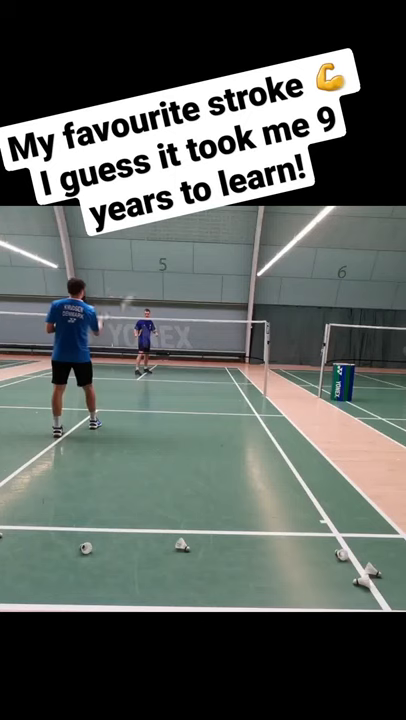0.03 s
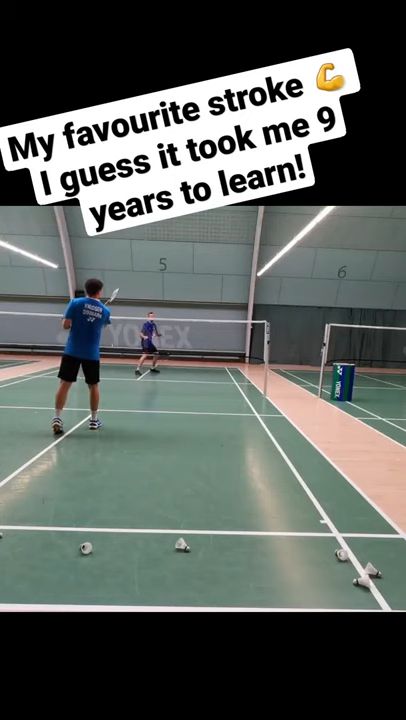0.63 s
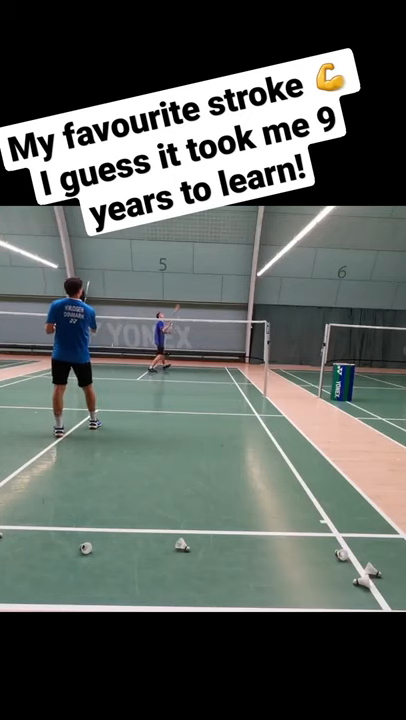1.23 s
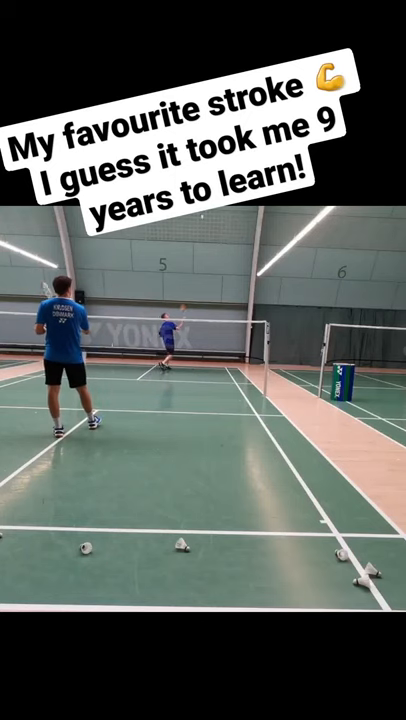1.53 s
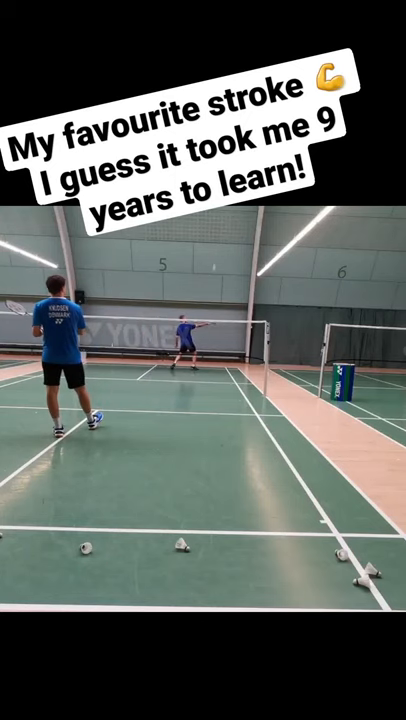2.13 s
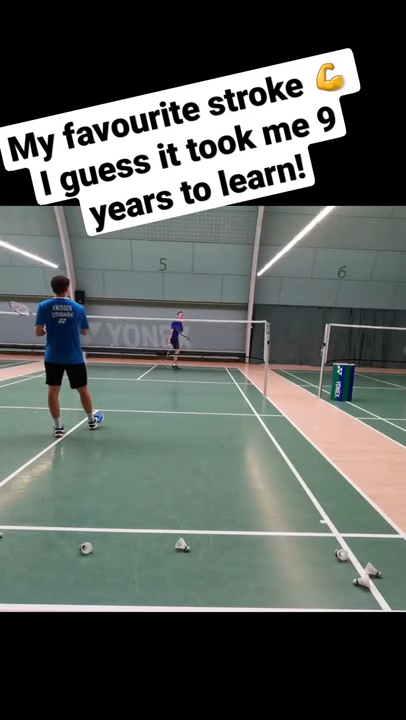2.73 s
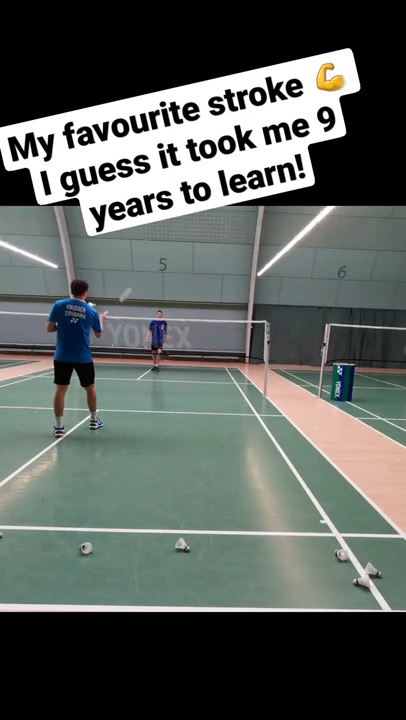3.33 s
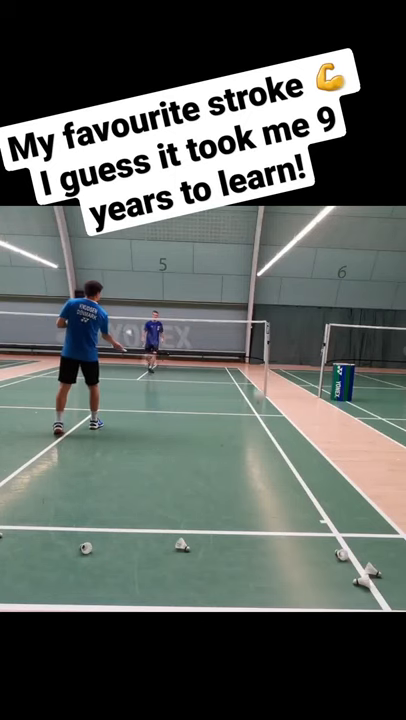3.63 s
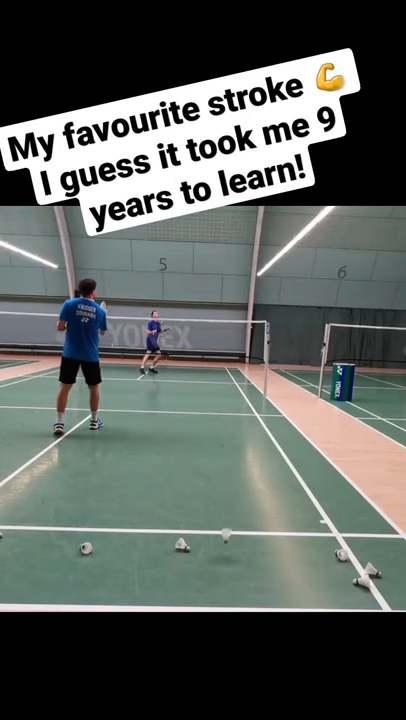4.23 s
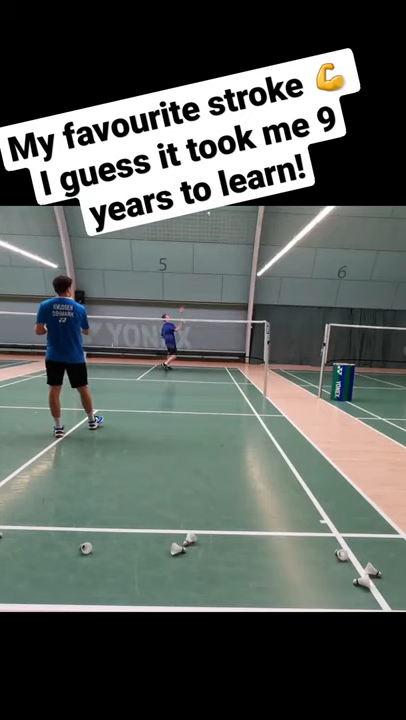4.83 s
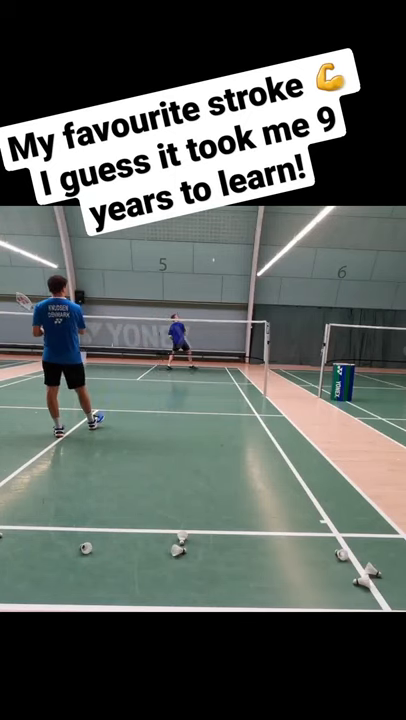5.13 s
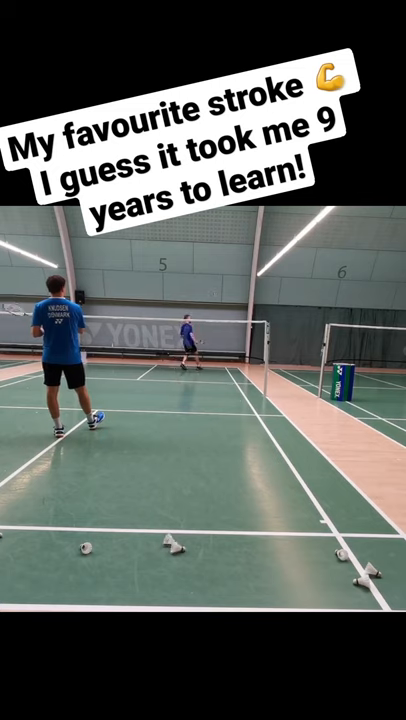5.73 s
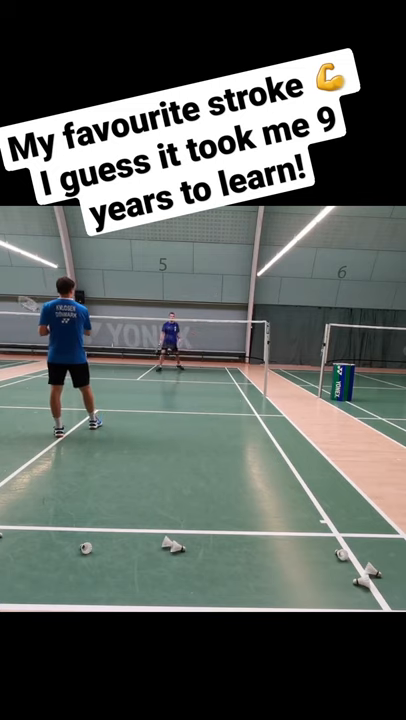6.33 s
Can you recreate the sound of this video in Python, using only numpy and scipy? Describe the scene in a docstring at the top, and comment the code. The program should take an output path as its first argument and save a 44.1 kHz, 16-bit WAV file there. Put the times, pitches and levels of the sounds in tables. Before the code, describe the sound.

A quiet hum of air fills a large sports hall. At about 0.7 seconds a badminton racket slices a shuttlecock with a crisp crack that bounces off the walls and leaves a long echo. A harder smash with a quick swish follows at 2.3 seconds. Between the shots, feet thud softly on the sprung floor, shoes scuff faintly and handled feathers give tiny dry ticks.

A lighter hit comes at 4 seconds, and immediately a shuttlecock knocks on the floor close to the microphone, hopping in smaller taps until about 5 seconds. From around 4.5 seconds a faint, rough low drone climbs slightly in pitch and grows louder. The second hard smash cracks at 5.7 seconds, and its echo fades through the hall as the drone swells and stops at about 6.4 seconds.

```python
"""A large vaulted hall during badminton practice. A near player hits four shuttles, soft slices and hard
smashes in turn: the racket swishes, cork cracks on the strings, and the crack bounces off floor and walls
and fills the vault. Shoes scuff, feet thud on the sprung floor and feathers tick as shuttles are handled.
One shuttle drops and hops beside the microphone. Air hums throughout; a low drone climbs near the end."""
import sys
import numpy as np
from scipy import signal
from scipy.fft import rfft, irfft, next_fast_len
from scipy.io import wavfile
from scipy.ndimage import map_coordinates

SR = 44100
rng = np.random.default_rng(int(sys.argv[2]) if len(sys.argv) > 2 else 0)


def master(y):
    """Save y as 16-bit WAV."""
    cut = np.clip(np.atleast_2d(y).T, -1, 1)
    pcm = np.round(cut * 32767)  # scale
    wavfile.write(sys.argv[1], SR, pcm.astype(np.int16))


N = 280917

# The rattle of a feather skirt. Each row: frequency in Hz, level in dB.
FEATHER_SPECTRUM = [(100, -20), (500, -7), (1200, 0), (2500, -1), (3600, 0), (6000, -4), (10000, -4),
                    (14500, -11), (18000, -35)]


def amp(db):
    return 10 ** (np.asarray(db) / 20)


def unit(x):
    return x / np.sqrt(np.mean(x ** 2) + 1e-20)


def along(points, hz):
    """Read a curve of (Hz, value) points on a log frequency axis."""
    knots, values = np.transpose(points)
    return np.interp(np.log(hz + 1), np.log(knots), values)


def filtered(x, response):
    """Shape x with a gain that depends on frequency."""
    n = x.shape[-1]
    size = next_fast_len(n + SR // 8)
    return irfft(rfft(x, size) * response(np.fft.rfftfreq(size, 1 / SR)), size)[..., :n]


def add(track, s, x):
    """Mix x into the track at s seconds."""
    i = max(round(s * SR), 0)
    track[:, i:i + x.shape[-1]] += x[..., :N - i]


def noise(spectrum, n, rings=()):
    """Diffuse stereo noise of rms 1, lifted at each (Hz, width in Hz, dB) resonance."""
    # Narrow bass, wide treble. Each row: frequency in Hz, left-right correlation.
    likeness = [(60, 0.69), (200, 0.97), (480, 0.69), (1000, 0.066), (2000, 0.079), (4500, 0.13),
                (9000, 0.048)]

    def response(hz):
        lift_db = sum(db / (1 + (2 * (hz - centre) / width) ** 2) for centre, width, db in rings)
        spread = np.arccos(np.clip(along(likeness, hz), -1, 1)) / 2
        return amp(along(spectrum, hz) + lift_db) * [np.cos(spread), np.sin(spread)]
    mid, side = filtered(rng.standard_normal((2, n)), response)
    return unit(np.array([mid + side, mid - side]))


def pulse(spectrum, size=4096):
    """A minimum-phase click of the given colour, peak 1."""
    cepstrum = irfft(np.log(amp(along(spectrum, np.fft.rfftfreq(size, 1 / SR)))))
    cepstrum[1:size // 2] *= 2
    cepstrum[size // 2 + 1:] = 0
    click = irfft(np.exp(rfft(cepstrum)))
    return click / np.abs(click).max()


def fade(t, t60):
    """Silence before t = 0, then a fall of 60 dB every t60 seconds."""
    return (t >= 0) * np.exp(-np.log(1000) * np.abs(t) / t60)


def swell(t, rise):
    """A soft bump that peaks at 1 after rise seconds."""
    return (t / rise * np.exp(1 - t / rise)) ** 2


def wobble(rate):
    """A smooth random curve, rate knots a second."""
    return map_coordinates(rng.standard_normal(int(N * rate / SR) + 4), [np.arange(N) * rate / SR])


def repeated(x, copies):
    """x plus its (delay in seconds, gain) copies."""
    return filtered(x, lambda hz: 1 + sum(gain * np.exp(-2j * np.pi * hz * s) for s, gain in copies))


def air():
    """A steady, bass-heavy bed of air noise."""
    # Room tone. Each row: frequency in Hz, level in dB.
    room_tone = [(15, -21), (25, -2.5), (55, -4.5), (119, -14), (331, -19), (410, -19.5), (469, -16),
                 (509, -24), (648, -18), (741, -21.5), (1900, -26), (2060, -20.5), (3440, -31), (6210, -37),
                 (15500, -42)]
    return amp(-60.5) * noise(room_tone, N)


def scuffs():
    """Sliding soles hiss, catching and slipping on the floor."""
    # The slides. Each row: start in seconds, level in dB, rise in seconds, hiss centre in Hz.
    slides = [(0.132, -59.5, 0.06, 4570), (1.551, -60, 0.11, 8400), (2.205, -64, 0.039, 5340),
              (3.17, -60, 0.1, 5030), (5.16, -58, 0.051, 4440), (5.291, -61, 0.072, 5000),
              (5.56, -58.5, 0.028, 4240)]
    # The rub of a sole. Each row: frequency in Hz, level in dB.
    sole = [(500, 0), (2500, -15), (4500, -14), (8000, -23), (15000, -35)]
    out, t = np.zeros((2, N)), np.arange(SR // 2) / SR
    for s, db, rise, hiss_hz in slides:
        grip = amp(2.5 * wobble(60)[:len(t)])
        hiss = noise(sole, len(t), [(hiss_hz, 1800, 8)])
        add(out, s, amp(db) * hiss * swell(t, rise) * grip)
    return out


def thud(hz, rise, rumble_gain):
    """The sprung floor swings for a few cycles and leaves a dull rumble."""
    t = np.arange(SR // 2) / SR
    swing = np.sin(2 * np.pi * hz * t) * swell(t, rise) ** 0.67
    rumble = noise([(20, -5), (55, 4), (150, -12), (350, -27), (2000, -73)], len(t))
    return swing + rumble_gain * rumble * swell(t, 1.6 * rise)


def footfalls():
    """Heavy steps boom at the floor's own pitch, heels knock higher and light footwork patters on."""
    # Heavy steps. Each row: start in seconds, level in dB, rise in seconds.
    steps = [(0.17, -55, .045), (0.902, -46.5, 0.044), (1.31, -50.5, 0.072), (1.76, -47, 0.036),
             (2.231, -44, 0.037), (2.745, -36, 0.035), (3.08, -46, .019), (3.807, -39.5, 0.021),
             (4.188, -41.5, .048), (4.681, -32, 0.034), (5.06, -50, 0.031), (5.61, -37.5, 0.022),
             (5.949, -45.5, 0.03)]
    # Heels on the boards. Each row: start in seconds, level in dB, pitch in Hz.
    heels = [(0.325, -54, 99), (1.58, -44, 165), (4.904, -43, 176), (5.544, -42, 132)]
    stride_s, scatter_s, scatter_octaves = .33, 0.0508, 0.244
    out = np.zeros((2, N))
    for s, db, rise in steps:
        add(out, s, amp(db) * thud(hz=49.7, rise=rise, rumble_gain=0.19))
    for s, db, hz in heels:
        low_mode = amp(-6.5) * thud(hz=84, rise=.011, rumble_gain=0.36)
        knock = thud(hz, rise=.011, rumble_gain=0.36)
        add(out, s, amp(db) * (knock + low_mode))
    for k, (late, higher) in enumerate(rng.standard_normal(size=(24, 2))):
        s = (k + .5) * stride_s + late * scatter_s
        if s < N / SR:
            hz = 66.5 * 2 ** (higher * scatter_octaves)
            add(out, s, amp(-59) * thud(hz, rise=0.03, rumble_gain=0.19))
    return out


def floor_bounce(x):
    """The near player is heard twice: directly, and off the floor."""
    return repeated(x, [(.0049, .7)])


def feather_ticks():
    """Feathers slip as a stack of shuttles is handled: slowing runs of dry ticks."""
    # Tick runs. Each row: start in seconds, number of ticks, first gap in seconds, level in dB.
    runs = [(0.283, 3, .027, -61.5), (0.483, 1, .03, -61), (1.519, 6, .0165, -53), (3.160, 3, .030, -52.5),
            (3.455, 1, .03, -50.5), (5.214, 1, .03, -50), (5.299, 2, .036, -55.5)]
    # One tick. Each row: frequency in Hz, level in dB.
    colour = [(300, -12), (1500, 5), (3500, 10), (5500, 3), (8500, -3), (15000, -9.5)]
    slowing = 1.4  # each gap over the one before
    out, t = np.zeros((2, N)), np.arange(SR // 2) / SR
    envelope = fade(t, 0.023) + 0.18 * fade(t, 0.5)  # the tick and its faint room tail
    for start, count, gap, db in runs:
        for k in range(round(count)):
            s = start + gap * (slowing ** k - 1) / (slowing - 1)
            add(out, s, amp(db) * floor_bounce(noise(colour, len(t)) * envelope))
    return out


def swish(colour):
    """Air whistles through the strings, louder as the racket speeds up."""
    t = np.arange(SR // 5) / SR
    return amp(-5.5) * noise(colour, len(t), [(7000, 8000, 2.9)]) * fade(t[-1] - t, 0.2)


def crack(smash, snap_db, feather_db, rings, string_hz):
    """Cork meets the strings, the skirt whips after it, the strings ring and the floor mirrors it all."""
    # The cork's snap in a slice and in a smash. Each row: frequency in Hz, level in dB.
    slice_snap = [(40, -30), (200, -6), (450, -8), (850, 0), (1350, -1), (1800, -9), (2800, -13),
                  (5000, -17), (13000, -26), (18000, -45)]
    smash_snap = [(40, -30), (200, -9), (450, -7), (800, 0), (1600, -2), (2800, -12), (5500, -10),
                  (13000, -23), (18000, -45)]
    # The skirt's whip: gains of its first and second rebound, relative to first contact.
    slice_whip = [1.2, .4]
    smash_whip = [.85, .1]
    whip, rebound_s = (smash_whip, 0.001202) if smash else (slice_whip, 0.001128)
    snap = amp(snap_db) * pulse(smash_snap if smash else slice_snap)
    t = np.arange(len(snap)) / SR
    envelope = fade(t, .007) + .15 * fade(t, .016)
    feathers = amp(feather_db) * noise(FEATHER_SPECTRUM, len(t), rings) * envelope
    blow = repeated(snap + feathers, [(rebound_s, whip[0]), (2 * rebound_s, whip[1])])
    strings = amp(-37) * np.sin(2 * np.pi * string_hz * t) * fade(t, 0.056)
    return floor_bounce(blow + strings)


def walls(smash, colour, rings):
    """Ribbed walls send the crack back as short, grainy bursts."""
    # Wall and roof reflections. Each row: delay in seconds, level in dB, decay time in seconds.
    slice_echoes = [(.008, 7, 0.076), (0.049, 1, .12), (.065, 3.5, 0.042), (.103, 3.5, .07),
                    (0.109, 2.5, 0.095)]
    smash_echoes = [(.008, 0, 0.12), (0.0169, 9.5, 0.13), (0.022, 9, 0.03), (.040, 5, .12),
                    (.105, -2.5, 0.057)]
    echoes = smash_echoes if smash else slice_echoes
    t = np.arange(SR // 3) / SR
    power = sum((amp(db) * fade(t - delay, t60)) ** 2 for delay, db, t60 in echoes)
    knots = t[::32]
    grain_db = 2.8 * np.interp(t, knots, rng.standard_normal(len(knots)))
    bursts = noise(colour, len(t), rings) * np.sqrt(power) * unit(amp(grain_db))
    # a short path loses little treble to the air
    return filtered(bursts, lambda hz: amp(along([(10000, -0.5), (15000, 8.5)], hz)))


def hall(colour, rings):
    """The vault fills and holds, then the level drops to a thinner tail that dies away, treble first."""
    # The reverb. Each row: frequency in Hz, decay time in seconds.
    decay_times = [(100, 2.3), (500, 2.87), (1500, 2.93), (4000, 2.59), (7000, 1.645), (10000, 0.98),
                   (15000, 0.63)]
    fill_s, hold_s, release_s, late_tail_db = 0.051, 0.43, 0.051, -8.5
    hz, t, bands = signal.stft(noise(colour, 2 * SR, rings), SR, nperseg=256)
    thinning = .5 + .5 * np.tanh((t - hold_s) / (2 * release_s))
    bloom = (1 - np.exp(-t / fill_s)) * amp(late_tail_db * thinning - 1.38)
    decay = fade(t, along(decay_times, hz)[:, None])
    brightness = amp(along([(2000, -2.34), (12000, 1.2)], hz))[:, None]
    return signal.istft(bands * bloom * decay * brightness, SR, nperseg=256)[1]


def racket_strokes():
    """Slices and smashes alternate: a swish, the crack, its reflections and the hall."""
    # The strokes. Each row: contact in seconds, snap and feather gains in dB, feather peak and
    # string pitch in Hz, then wall, hall and swish gains in dB.
    strokes = [(0.6848, -13, -21.5, 4120, 1014, -31.5, -30.5, -72),
               (2.3461, -5.5, -18.5, 5400, 1550, -29.5, -25.5, -41.5),
               (3.9952, -17.5, -19.5, 3020, 1190, -31.5, -30, -56),
               (5.6813, -7, -20.5, 5700, 1680, -29.5, -26, -44.5)]
    # The colour thrown into the hall, one list a stroke. Each row: frequency in Hz, level in dB.
    colours = [
        [(71, -42), (120, -7), (170, -8), (390, -4.5), (478, -3.5), (563, -6), (1060, 2), (1650, -7.5),
         (2290, -4), (3510, -14), (4050, -9.5), (4480, -10.5), (8250, -15), (10700, -13.5), (15500, -30)],
        [(71, -42), (120, -13), (271, -1.5), (319, -9), (441, -5.5), (530, -1.5), (1120, -4), (1620, -4.5),
         (1790, -5.5), (2110, -2.5), (2440, -11), (5170, -9), (7610, -13), (10700, -13.5), (15500, -28.5)],
        [(71, -12), (120, -1), (150, -6.5), (353, -5.5), (459, -4), (623, -4.5), (812, -2.5), (1170, -2),
         (1410, -0.5), (1690, -6.5), (2240, -6), (3890, -9), (5490, -10), (10700, -15), (15500, -34)],
        [(71, -35), (120, -10), (163, -11.5), (271, -3.5), (312, -7.5), (407, 0), (530, -3.5), (586, 1),
         (1170, -4.5), (1650, -4), (1870, -3.5), (4050, -11.5), (5380, -11), (11000, -15), (15500, -27)],
    ]
    # Racket and shuttle resonances, one list a stroke. Each row: centre in Hz, width in Hz, lift in dB.
    resonances = [
        [(1010, 270, -1.5), (2880, 620, -3), (2300, 170, 1), (3970, 69, 5)],
        [(790, 250, 2.5), (1697, 27, 6), (2130, 340, 2)],
        [(1230, 140, -0.5), (2220, 340, 5), (5350, 3100, -8.5)],
        [(810, 74, 1.5), (1680, 27, 6.5), (2950, 200, 4)],
    ]
    # A smash's clean slap off one wall: delay in seconds, gain in dB.
    back_wall = (.0188, -8)
    out = np.zeros((2, N))
    for stroke, colour, rings, smash in zip(strokes, colours, resonances, [False, True] * 2):
        s, snap_db, feather_db, feather_hz, string_hz, wall_db, hall_db, swish_db = stroke
        hit = crack(smash, snap_db, feather_db, rings + [(feather_hz, 1600, 7)], string_hz)
        swing = amp(swish_db) * swish(colour)
        add(out, s - (swing.shape[-1] - 1) / SR, swing)  # ends on contact
        add(out, s, hit)
        if smash:
            # the racket's other face radiates toward the back wall, with opposite sign
            add(out, s + back_wall[0], -amp(back_wall[1]) * hit)
        add(out, s, amp(wall_db) * walls(smash, colour, rings))
        add(out, s, amp(hall_db) * hall(colour, rings))
    return out


def dropped_shuttle():
    """At each hop the cork knocks on the mat, the hollow skirt rings and the feathers rattle."""
    # The hops. Each row: start in seconds, cork gain in dB, feather gain in dB.
    hops = [(4.0419, -6, -31.5), (4.5161, -16, -50), (4.692, -25.5, -52.5), (4.8030, -30.5, -52),
            (4.861, -26.5, -55.5), (5.0570, -33, -57.5)]
    # The cork's knock. Each row: frequency in Hz, level in dB.
    cork = [(60, -10), (220, 0.5), (550, -1), (900, -4.5), (1400, -5.5), (3000, -23), (14000, -35)]
    out, knock = np.zeros((2, N)), pulse(cork)
    t = np.arange(len(knock)) / SR
    skirt = 0.15 * np.sin(2 * np.pi * 520 * t) * fade(t, 0.052)
    for s, cork_db, feather_db in hops:
        body = knock + skirt + 0.35 * noise(cork, len(t)) * fade(t, 0.047)
        rattle = noise(FEATHER_SPECTRUM, len(t)) * fade(t, .035)
        add(out, s, amp(cork_db - 12.5) * body + amp(feather_db) * rattle)
    return out


def drone():
    """A rough low drone climbs to a steady pitch and grows louder until it stops."""
    start_s, stop_s, attack_s, release_s = 4.55, 6.36, 0.052, 0.14
    from_hz, to_hz, climb_hz_per_s = 87, 111, 22
    t = np.arange(N) / SR
    since, remaining = t - start_s, stop_s - t
    hz = np.clip(from_hz + climb_hz_per_s * since, from_hz, to_hz)
    phase = 2 * np.pi * np.cumsum(hz) / SR
    tone = amp(2.5 * wobble(18)) * np.sin(phase + .5 * wobble(18))
    rumble = noise([(60, -61), (100, -2), (140, -0.5), (190, -17.5), (250, -9.5), (500, -51),
                    (2000, -84)], N)
    gate = np.clip(since / attack_s, 0, 1) * np.clip(remaining / release_s, 0, 1) ** 2
    surge_db = 14 * np.exp(-np.abs(remaining) / 0.4)
    return gate * amp(-57.5 + surge_db) * (tone + 0.67 * rumble)


def scene():
    return racket_strokes() + dropped_shuttle() + feather_ticks() + scuffs() + footfalls() + drone() + air()


def record(dry):
    """The sound opens after an instant; the right microphone hears more, above all in the treble."""
    # The lean to the right. Each row: frequency in Hz, right minus left in dB.
    tilt = [(150, 2), (450, 6), (1000, 5), (2100, 6), (4500, 3.7), (9000, 8.5), (13000, 10.5)]
    open_s, fade_in_s, top_hz = 0.12, 0.0092, 16100

    def microphones(hz):
        gains = amp(np.outer([-.5, .5], along(tilt, hz)))
        lowpass = 1 / (1 + (hz / top_hz) ** 120)
        return lowpass * gains / np.sqrt(np.mean(gains ** 2, axis=0))
    opened = np.clip((np.arange(N) / SR - open_s) / fade_in_s, 0, 1)
    return filtered(dry * opened, microphones)


dry = scene()
out = record(dry)
master(out)
```